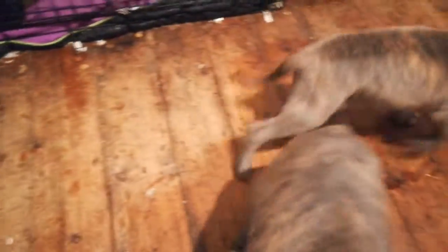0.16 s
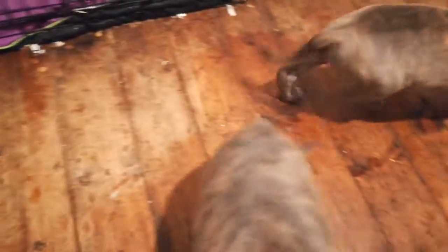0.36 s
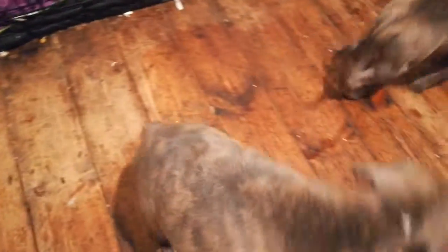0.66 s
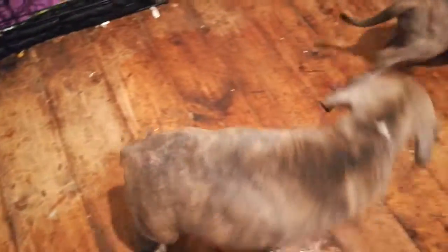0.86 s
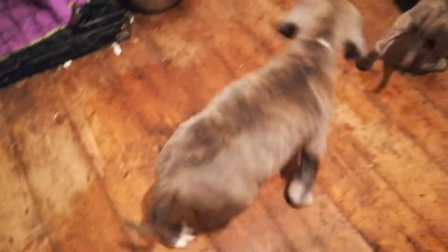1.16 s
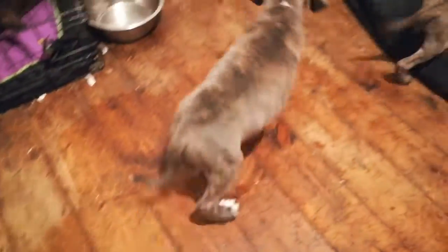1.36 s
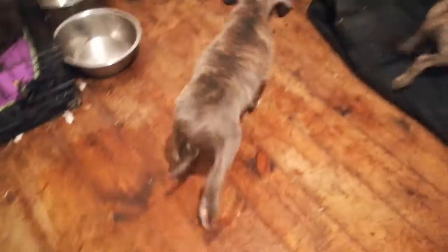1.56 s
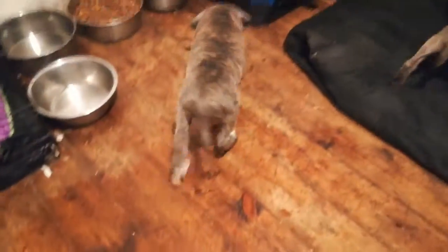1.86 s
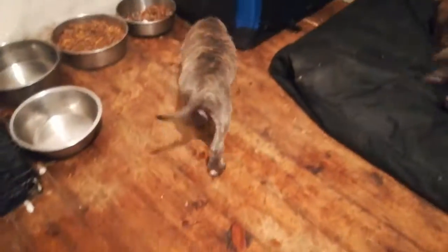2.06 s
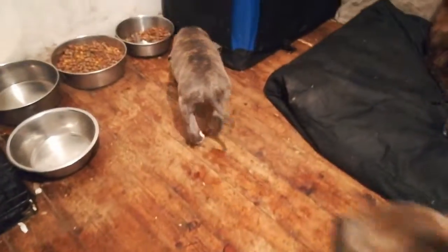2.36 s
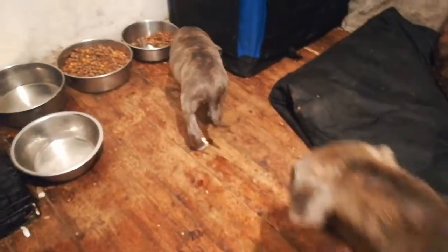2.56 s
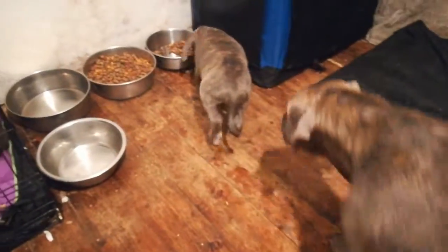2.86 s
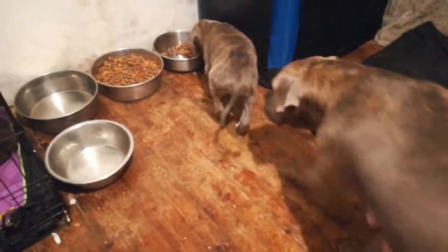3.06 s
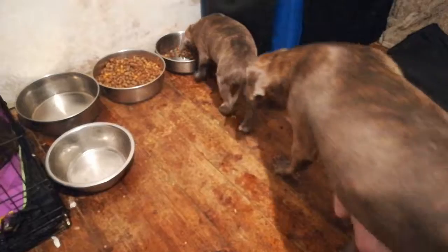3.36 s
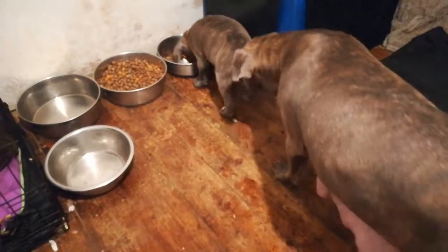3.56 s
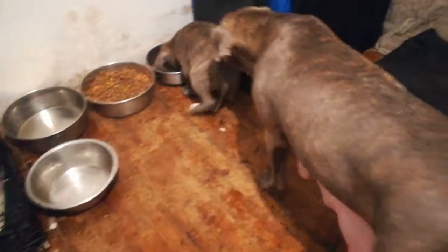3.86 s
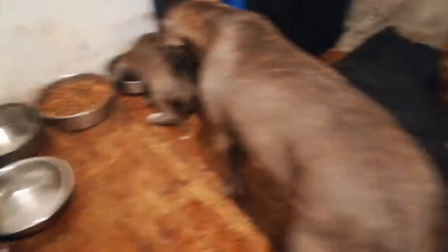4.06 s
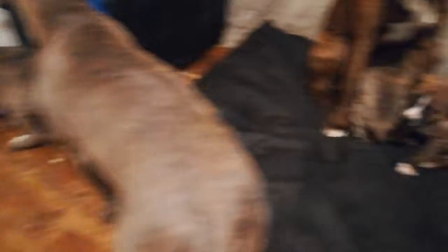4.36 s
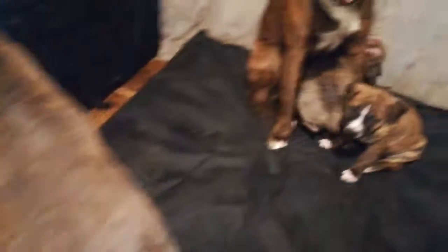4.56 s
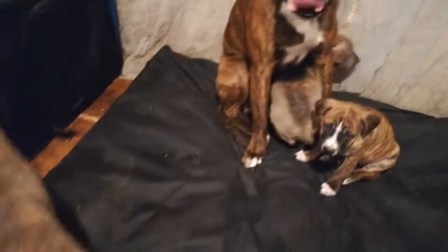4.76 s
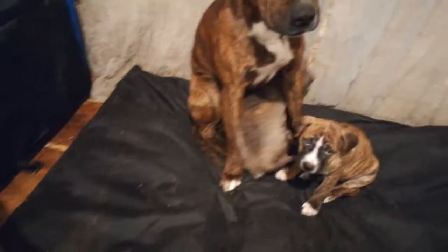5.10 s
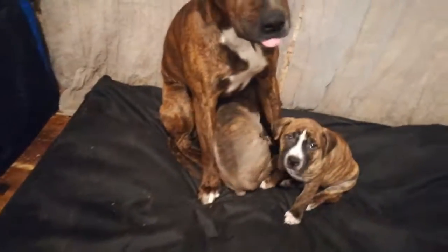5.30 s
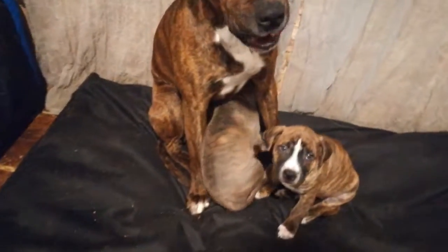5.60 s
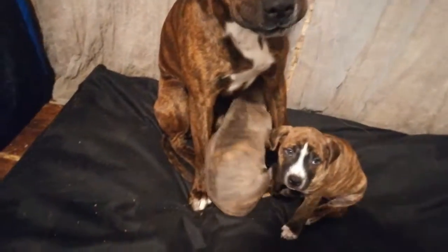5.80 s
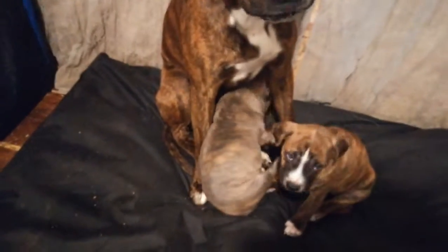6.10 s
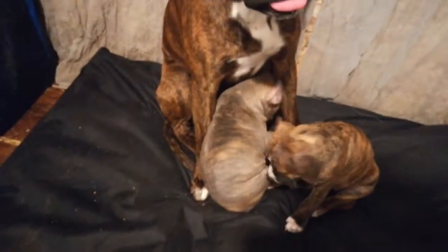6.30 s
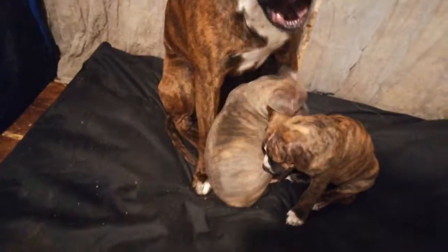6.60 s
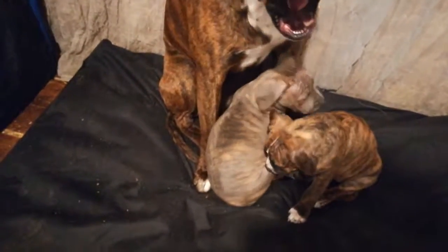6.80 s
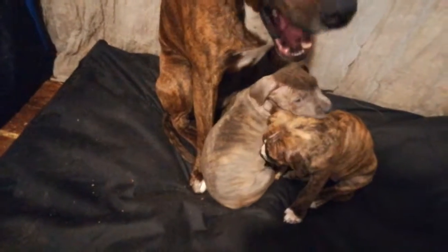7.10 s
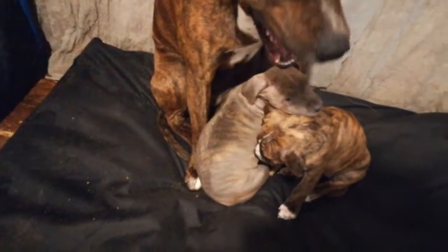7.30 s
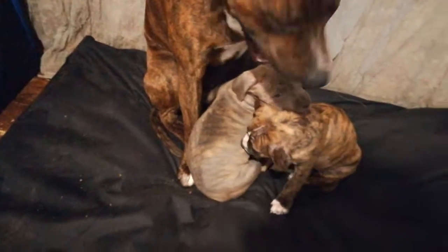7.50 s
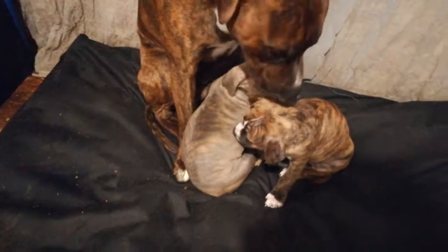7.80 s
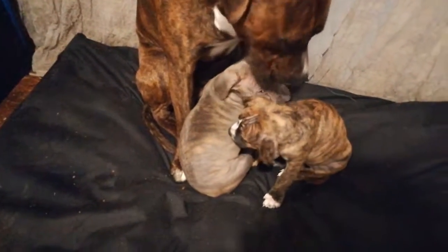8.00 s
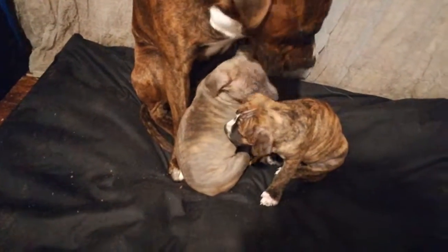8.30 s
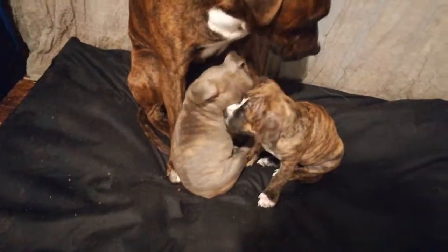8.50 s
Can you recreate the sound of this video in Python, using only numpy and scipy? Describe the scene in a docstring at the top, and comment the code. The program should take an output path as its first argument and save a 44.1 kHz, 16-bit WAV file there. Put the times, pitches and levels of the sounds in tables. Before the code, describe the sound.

Close phone pickup in a small bare-walled room with short bright echo and faint hiss. From 0 s puppy paws scuffle on wooden boards: dull thumps, sharp claw ticks, short scrapes; a small metal tag clinks at once and at 0.2 s. A faint low grunt comes near 0.9 s and thin breathy nose whistles follow. A hard knock lands at 1.6 s, a sharper one with a slide at 2.2 s. A puppy whimpers at 1.75, 2.05, 2.7 and 3.2 s, high tones mostly gliding down, the last strongest near 3.5 s. From 3.5 to 6 s irregular knocks and rubs continue with high whistles around 4.2 s but no cries. At 6.1-6.9 s the scuffle is heaviest, with whistles and short cries. Then paws quiet: a longer falling whine at 7.1 s, a faint low one at 7.8 s, and a last cry from 8.2 s dips and rises to the end.

```python
"""Puppies on a wooden floor in a small bare room, heard by a phone held above them.
From the start paws scuffle (filtered noise and grains) and a metal tag clinks twice (ringing modes);
soon mixed short puffs (band-passed noise) and paw blows (ringing boards, noise cracks) join in.
Low grunts, then thin nasal whistles (breathy gliding sines) follow; from 1.75 s one puppy whimpers
in cries, mostly falling: a strong tone with weak husky overtones. Bare walls echo all but the scuffle."""
import sys
import numpy as np
from scipy import signal
from scipy.fft import rfft, irfft
from scipy.io import wavfile
from scipy.ndimage import uniform_filter1d

SR = 44100
rng = np.random.default_rng(int(sys.argv[2]) if len(sys.argv) > 2 else 0)


def put_to_file(sound):
    """Save the sound as 16-bit audio at rate SR, in the file named by the first command-line argument."""
    columns = np.atleast_2d(sound).T  # one column per channel
    safe = np.clip(columns, -1, 1)
    whole_steps = np.round(safe * 32767)
    wavfile.write(sys.argv[1], SR, whole_steps.astype(np.int16))


N = 381465
T = np.arange(N) / SR


def undb(db):
    """Amplitude ratio of a level in dB."""
    return 10 ** (np.asarray(db) / 20)


def unit(x):
    """Scale to an RMS of 1."""
    return x / np.sqrt(np.mean(x ** 2))


def band(x, hz, width_hz):
    """Band-pass whose edges have the centre as geometric mean."""
    middle = np.hypot(hz, width_hz / 2)
    edges = [middle - width_hz / 2, min(middle + width_hz / 2, SR / 2.1)]
    return signal.sosfilt(signal.butter(2, edges, "band", fs=SR, output="sos"), x)


def walk(rate_hz, size=N):
    """Random levels held 1 / rate_hz and slewed twice; spread near 1."""
    hold = max(int(SR / rate_hz), 1)
    steps = np.repeat(rng.standard_normal(size // hold + 1), hold)
    return 1.456 * uniform_filter1d(uniform_filter1d(steps, hold), hold)[:size]


def pan(x, db):
    """Two channels, the left one db above the right."""
    return x * undb(np.array([db, -db]).reshape(2, -1) / 2)


def add(out, start_s, x):
    """Mix x into out from start_s, cut at the end."""
    i = int(start_s * SR)
    out[:, i:i + x.shape[1]] += x[:, :N - i]


def air():
    """Quiet room tone and microphone hiss: spectrally shaped noise at a drifting level."""
    # noise spectrum: (frequency [Hz], relative density [dB])
    spectrum = [(15, -29), (25, 10), (729, -26), (981, -13.5), (1180, -19), (1360, -14.5), (1640, -29),
                (1780, -23.5), (3780, -30), (5820, -17), (15800, -33)]
    level_db = -56.5
    hz, db = np.transpose(spectrum)
    f = np.maximum(np.arange(N // 2 + 1) * SR / N, 1)
    gain = undb(np.interp(np.log(f), np.log(hz), db))
    noise = irfft(rfft(rng.standard_normal((2, N))) * gain, N)
    return unit(noise) * undb(level_db + 0.82 * walk(4.67))


def grains(rate_hz, spread_db):
    """Dense tiny contacts of very uneven size."""
    hit = rng.random((2, N)) < rate_hz / SR
    return hit * rng.standard_normal((2, N)) * undb(spread_db * rng.exponential(size=(2, N)))


def moves(start_s, held_s, level_db, rise_fall, rest_db):
    """Gain of a layer: every move swells in, holds and dies away (dB/s slopes) over a faint stir."""
    power = np.full(N // 40 + 1, undb(rest_db) ** 2)
    t = np.linspace(0, T[-1], len(power))
    rise, fall = rise_fall
    for s, held, db in zip(start_s, held_s, level_db):
        slope_db = rise * np.maximum(s - t, 0) + fall * np.maximum(t - s - held, 0)
        power += undb(db - slope_db) ** 2
    return np.interp(T, t, np.sqrt(power))


def rumble():
    """Weight shifting on the boards: noise bands, strongest near the boards that give most."""
    # weight coming down: (time [s], held [s], level [dB], pitch of the boards that give most [Hz])
    weight = [(.01, .01, -45.5, 153), (.18, .1, -39.5, 76), (.52, 0.074, -45, 210),
              (.79, 0.039, -43.5, 190), (1.08, 0.043, -44, 230), (1.3, 0.16, -48.5, 151),
              (1.6, 0.033, -42, 130), (1.71, .01, -43.5, 157), (1.95, 0.0073, -47, 70),
              (2.17, .005, -39.5, 178), (2.24, .01, -60, 150), (2.53, .1, -57, 60), (3.11, 0.18, -61.5, 60),
              (3.35, .03, -52, 180), (3.48, 0.13, -44.5, 80), (3.73, 0.0043, -46.5, 99),
              (3.85, 0.1, -44, 80), (4.045, 0.029, -38, 122), (4.15, 0.042, -43, 135),
              (4.3, 0.067, -45.5, 90), (4.48, .05, -50, 220), (4.57, 0.045, -47, 70),
              (4.83, 0.086, -44.5, 101), (5.08, .08, -52, 45), (5.269, 0.058, -44, 121),
              (5.5, 0.055, -44, 70), (5.74, 0.046, -40.5, 70), (5.93, 0.09, -45, 30),
              (6.1, 0.071, -46, 70.4), (6.19, 0.046, -38.5, 75), (6.53, 0.035, -33.5, 100),
              (6.63, 0.045, -35, 79.6), (6.821, 0.049, -34, 81), (7.11, 0.045, -54, 59.5),
              (7.72, 0.04, -46.5, 80), (8.29, 0.018, -49, 280), (8.64, .01, -55, 201)]
    # board bands: (centre [Hz], width [Hz], relative level [dB])
    board_bands = [(25.8, 9.8, 1), (45, 17, -10.5), (74, 18, -1.5), (121.7, 28.4, 0), (192.6, 71, -1.5),
                   (298, 58, -5)]
    off_pitch_db_per_octave, rest_db, rise_fall_db_per_s = 6.5, -69, (370, 217)
    push, out = rng.standard_normal((2, N)), np.zeros((2, N))
    s, held_s, low_db, board_hz = np.transpose(weight)
    for hz, width_hz, db in board_bands:
        band_db = low_db - off_pitch_db_per_octave * abs(np.log2(hz / board_hz))
        gain = moves(s, held_s, band_db, rise_fall_db_per_s, rest_db)
        out += undb(db) * unit(band(push, hz, width_hz)) * gain
    return out


def scuffle():
    """Weight rumbles on the boards, dragged pads rub and claws rasp: bands of noise and of grains."""
    # drags: (time [s], held [s], pad rub level [dB], claw rasp level [dB], rasp brightness [dB/octave])
    drags = [(.005, 0.11, -56.5, -53.5, 3), (.18, 0.039, -52, -49.5, -1), (.3, 0.096, -56, -56, 1.5),
             (0.548, 0.11, -60.5, -56.5, 5.5), (.72, 0.047, -57, -65.5, -9.5), (.805, 0.052, -55, -56.5, 1),
             (1.06, 0.051, -61.5, -83, 12), (1.302, .03, -52, -64, 2), (1.39, 0.14, -59, -62.5, .1),
             (1.588, 0.018, -44.5, -64, 2), (1.721, 0.052, -54.5, -63, -2), (1.88, 0.012, -74, -75, 1),
             (2.178, 0.0034, -39.5, -50.5, -2), (2.88, 0.22, -73.5, -86, -14), (3.3, .005, -72, -57, 4),
             (3.35, 0.0059, -55.5, -76, .1), (3.558, 0.0034, -46.5, -49, .1),
             (3.68, 0.0061, -54.5, -77, .1), (3.78, 0.019, -62.5, -63, -4), (3.93, 0.043, -67, -61.5, -1.5),
             (4.05, 0.033, -51, -54.5, 1), (4.2, 0.02, -66.5, -63.5, -10.5),
             (4.31, 0.033, -64.5, -59, -0.5), (4.38, 0.081, -51.5, -53, 0),
             (4.568, 0.005, -52, -51.5, -3.5), (4.94, 0.026, -67, -60, -1), (5.059, 0.074, -54.5, -55, 2),
             (5.3, 0.041, -74, -62.5, 1.5), (5.45, 0.021, -70.5, -67, 1), (5.727, 0.03, -50.5, -55.5, -6),
             (6.11, .06, -56, -53.5, -1.5), (6.19, .025, -51.5, -43, 6.5), (6.537, 0.042, -46.5, -52, -3),
             (6.62, .03, -53, -52, -2.5), (6.71, 0.045, -58, -46.5, 4), (6.82, 0.09, -55.5, -66, 1),
             (7.33, 0.06, -99.5, -87, 2), (8.25, 0.17, -74.5, -68, -2), (8.63, .02, -68, -75, .1)]
    # pad rub bands: (centre [Hz], width [Hz], relative level [dB])
    rub_bands = [(530, 1300, 8), (1244, 1320, -0.5), (2030, 2840, -2.5)]
    # claw rasp bands: (centre [Hz], width [Hz], relative level [dB])
    rasp_bands = [(4220, 4800, 2.5), (6000, 8000, 2.5), (7580, 2050, 0.5), (10550, 3200, -11.5),
                  (14100, 17000, -3)]
    rub_rest_db, rub_rise_fall_db_per_s = -77, (330, 176)
    rasp_rest_db, rasp_rise_fall_db_per_s = -74.5, (440, 145)
    drag, scratch = grains(3000, 1.6), grains(6000, 1.3)
    s, held_s, rub_db, rasp_db, bright_db = np.transpose(drags)
    rub, rasp = np.zeros((2, N)), np.zeros((2, N))
    for hz, width_hz, db in rub_bands:
        rub += undb(db + 1.62 * walk(14)) * unit(band(drag, hz, width_hz))
    rub *= moves(s, held_s, rub_db, rub_rise_fall_db_per_s, rub_rest_db)
    for hz, width_hz, db in rasp_bands:
        band_db = rasp_db + bright_db * np.log2(hz / rasp_bands[2][0])
        gain = moves(s, held_s, band_db, rasp_rise_fall_db_per_s, rasp_rest_db)
        rasp += undb(db + 3.5 * walk(18)) * unit(band(scratch, hz, width_hz)) * gain
    return rumble() + rub + rasp


def ring(modes, jitter, size):
    """Decaying sines of a struck object, every mode a little different each time."""
    t, (hz, db, t60_s) = T[:size, None], np.transpose(modes)
    hz = hz * (1 + jitter * rng.standard_normal(len(hz)))
    db = db + 3 * rng.standard_normal(len(hz))
    return (undb(db - 60 * t / t60_s) * np.sin(2 * np.pi * hz * t)).sum(axis=1)


def tag_clinks():
    """A small metal tag rings in high, short modes."""
    # modes of the tag: (frequency [Hz], level [dB], t60 [s])
    tag = [(5100, -10, .06), (7450, -10, .08), (11930, -4, .07), (12020, 0, .07), (15050, -2, .05)]
    # clinks: (time [s], level [dB])
    clinks = [(.005, -40), (0.171, -35.5)]
    out = np.zeros((2, N))
    for s, db in clinks:
        add(out, s, pan(undb(db) * ring(tag, jitter=0.0038, size=9000), -0.87))
    return out


def puffs():
    """Short puffs of band-passed noise: breathy blips, faint murmurs, soft scrapes, in a rounded swell."""
    # puffs: (time [s], length [s], centre [Hz], width [Hz], level [dB])
    blips = [(.165, 0.028, 4870, 1200, -42), (0.79, 0.045, 5260, 696, -46.5),
             (4.925, 0.045, 5730, 600, -57), (6.8, 0.073, 346, 350, -50.5), (0.366, 0.053, 1360, 704, -48),
             (3.453, 0.14, 5800, 6950, -51), (4.623, 0.059, 1450, 350, -50.5),
             (5.139, 0.11, 1530, 350, -52.5), (5.204, 0.086, 1470, 350, -54.5),
             (1.047, 0.057, 497, 704, -50), (3.966, 0.035, 806, 400, -54), (4.407, 0.045, 890, 800, -43),
             (4.798, 0.073, 4960, 900, -53.5), (4.847, 0.081, 2780, 600, -58), (4, 0.11, 2840, 756, -73),
             (5.256, 0.11, 8900, 1200, -57), (5.944, 0.03, 1660, 1490, -55.5)]
    out = np.zeros((2, N))
    for s, length_s, hz, width_hz, db in blips:
        puff = unit(band(rng.standard_normal(4000), hz, width_hz))[:int(length_s * SR)]
        add(out, s, pan(undb(db) * puff * np.hanning(len(puff)), 0))
    return out


def blows():
    """Each paw knocks the boards, cracks a claw with a colour of its own and slides a little."""
    # paw blows: (time [s], board knock level [dB], claw crack level [dB], slide hiss level [dB],
    # thump pitch [Hz], crack colour [Hz])
    paws = [(0.167, -35, -32, -62, 150, 1900), (0.348, -44, -40.5, -52, 140, 1220),
            (0.539, -47, -44, -39.5, 280, 1290), (0.801, -43, -31, -64, 182, 1980),
            (1.058, -38, -50, -66, 243, 960), (1.287, -38.5, -34.5, -54, 258, 2060),
            (1.38, -37, -37.5, -48, 178, 930), (1.519, -38, -32.5, -44, 230, 860),
            (1.571, -27.5, -31, -42, 113, 930), (1.867, -50, -39, -61, 99.6, 1590),
            (2.119, -36, -35, -64, 183, 1630), (2.165, -29.5, -21.5, -26.5, 191, 1360),
            (2.519, -61, -45, -74, 96.9, 1470), (3.33, -42, -51, -57, 213, 1530),
            (3.543, -37, -36, -42, 73.4, 1500), (3.671, -34, -39, -65, 138, 860),
            (3.918, -42.5, -51, -56, 150, 1830), (4.035, -30, -30, -47, 130, 895),
            (4.2, -49, -37, -78, 209, 1800), (4.348, -38.5, -40.5, -57, 170, 920),
            (4.565, -48, -37.5, -56, 312, 2000), (4.927, -40, -51, -48, 64.6, 940),
            (5.049, -63, -39, -70, 306, 2530), (5.248, -41.5, -43.5, -51, 124, 1490),
            (5.64, -46, -58, -48, 238, 859), (5.714, -43, -32, -70, 75.4, 1290),
            (6.093, -37.5, -39.5, -50, 230, 1770), (6.183, -29, -34.5, -35, 247, 1730),
            (6.512, -27, -34, -64, 127, 1340), (6.615, -34, -31, -61, 77, 895),
            (6.699, -53, -42, -46, 70.0, 2160), (6.814, -33, -40, -68, 78.1, 1400),
            (7.7, -46.5, -51, -64, 83.4, 2090), (8.62, -65, -37, -50, 356, 1340)]
    # modes of the boards: (frequency [Hz], level [dB], t60 [s])
    boards = [(73, -23, 0.11), (117.6, -18.5, 0.33), (189.6, -6.5, 0.21), (242, -5, 0.16),
              (330, -6.5, 0.08), (463, -18, .053), (631, -11, 0.099), (864, 9.5, 0.098)]
    burst_db, snap_t60_s = 7.5, 0.023
    slide_db, slide_t60_s = -9, .19  # slide relative to the snap
    contact_s, hard_db = .0012, -28  # contact time of a blow this loud; softer ones take longer
    out, t = np.zeros((2, N)), T[:9000]
    snap, slide = undb(-60 * t / snap_t60_s), undb(slide_db - 60 * t / slide_t60_s)
    burst = undb(burst_db) * (snap + slide)
    for s, knock_db, crack_db, hiss_db, thump_hz, crack_hz in paws:
        touch = np.minimum(t / (contact_s * undb(hard_db - max(crack_db, hiss_db))), 1)
        noise = rng.standard_normal(len(t)) * burst * touch
        # the blow drives the board modes nearest its own pitch hardest
        struck = ring(boards, jitter=0.059, size=len(t)) * np.sqrt(touch)
        knock = band(struck, thump_hz, 1.13 * thump_hz)
        crack = band(noise, crack_hz, 0.42 * crack_hz) + undb(-2.0) * band(noise, 1580, 1970)
        hiss = band(noise, 4170, 6600)
        blow = undb(knock_db) * knock + undb(crack_db) * crack + undb(hiss_db) * hiss
        add(out, s, pan(blow, 0))
    return out


def sing(table, waver, shimmer_db):
    """Start of a call, its wavering phase, a soft-edged trembling swell and its other columns."""
    s, hz, *rest = np.transpose(table)
    t = T[int(s[0] * SR):int(s[-1] * SR)]
    size = len(t)
    pitch_hz = np.interp(t, s, hz) * (1 + waver * (walk(121.0, size=size) + walk(29.95, size=size)))
    phase = 2 * np.pi * np.cumsum(pitch_hz) / SR
    edge = np.clip(np.minimum(t - t[0], t[-1] - t) / .004, 0, 1)
    swell = np.sqrt(2) * edge * undb(shimmer_db * walk(42.34, size=size))
    return s[0], phase, swell, [np.interp(t, s, column) for column in rest]


def husk(phase, rough):
    """A partial with breath noise wrapped round it."""
    size = len(phase)
    noise = walk(247.2, size=size) * np.sin(phase) + walk(245.6, size=size) * np.cos(phase)
    return np.sin(phase) + rough * noise


def arch(row, rise_db, fade_db):
    """A short call glides straight between two pitches, swells to its peak and fades."""
    s, length_s, first_hz, last_hz, db = row
    share = 0.81 if last_hz > 1.1 * first_hz else 0.34  # upward leaps peak near their top
    peak_hz = first_hz + share * (last_hz - first_hz)
    return [(s, first_hz, db - rise_db), (s + share * length_s, peak_hz, db),
            (s + length_s, last_hz, db - fade_db)]


def grunts():
    """Low grunts: one breathy partial each, gliding down."""
    # grunts: (time [s], length [s], first pitch [Hz], last pitch [Hz], peak level [dB])
    calls = [(0.921, .2, 376, 329.4, -56.5), (2.62, .2, 265, 257, -60.5)]
    out = np.zeros((2, N))
    for call in calls:
        s, phase, swell, (db,) = sing(arch(call, rise_db=5.5, fade_db=5), waver=0.025, shimmer_db=4.5)
        add(out, s, pan(swell * undb(db) * husk(phase, .4), 0))
    return out


def whistles():
    """Nasal whistles: a breathy gliding tone with a faint octave, leaning left."""
    # whistles: (time [s], length [s], first pitch [Hz], last pitch [Hz], peak level [dB])
    calls = [(1.021, 0.067, 6970, 6940, -65.5), (1.464, 0.12, 8360, 8720, -55.5),
             (1.703, 0.068, 8780, 8440, -62), (1.827, .06, 7070, 7100, -59), (2, 0.14, 7960, 8040, -42.5),
             (2.22, 0.048, 9180, 9120, -55), (2.406, .09, 6810, 7110, -56), (2.965, 0.074, 6760, 6760, -51),
             (3.543, .12, 7015, 7050, -39.5), (3.75, 0.11, 7120, 7000, -43),
             (4.149, 0.049, 7770, 6950, -37.5), (4.161, 0.077, 7040, 7000, -44),
             (4.356, 0.031, 7400, 9340, -42), (4.378, 0.072, 9300, 9170, -43.5),
             (4.397, .12, 7250, 6850, -37.5), (4.943, 0.058, 5220, 5220, -55),
             (5.798, 0.07, 6800, 6720, -55.5), (6.124, .07, 7220, 9480, -46),
             (6.176, 0.081, 6380, 6500, -39), (6.344, 0.075, 7130, 7126, -34),
             (6.402, 0.09, 7350, 6770, -48.5), (7.019, 0.07, 8200, 8300, -63.5),
             (7.471, 0.093, 7000, 7100, -67.5), (7.97, 0.068, 7320, 7220, -71),
             (8.153, 0.11, 8000, 8050, -60)]
    pan_db, octave_db = 13, -21
    out = np.zeros((2, N))
    for call in calls:
        s, phase, swell, (db,) = sing(arch(call, rise_db=6.5, fade_db=29), waver=.008, shimmer_db=3.5)
        no_alias = np.gradient(phase) < np.pi / 3.05
        octave = undb(octave_db) * np.sin(2 * phase) * no_alias
        add(out, s, pan(swell * undb(db) * (husk(phase, .5) + octave), pan_db))
    return out


def cries():
    """Cries: a strong tone, weak husky overtones coloured by throat and mouth, and nasal air."""
    # one table a cry: (time [s], pitch [Hz], level [dB], overtone lift by the open mouth [dB])
    calls = [
        [(1.75, 1624, -60, 8), (1.768, 1540, -40, 11), (1.8, 1489, -42.5, 1.5), (1.86, 1538, -54, 14),
         (1.9, 1455, -56, -4)],
        [(2.04, 1770, -90, 5), (2.066, 1648, -48.5, 1), (2.15, 1627, -65, 0), (2.174, 1581, -35, 6.5),
         (2.252, 1517, -41, -16), (2.292, 1366, -34, -2.5), (2.412, 1350, -38, -3), (2.5, 1327, -64, -5)],
        [(2.7, 1527, -67, 0), (2.712, 1550, -40, -10), (2.732, 1514, -33, -3), (2.79, 1436, -41, -0.5),
         (2.832, 1385, -37.5, -7), (2.93, 1369, -35.5, 1.5), (3.014, 1367, -57, -3), (3.05, 1260, -61, 0)],
        [(3.2, 1663, -96, 5), (3.212, 1682, -42, 1.5), (3.26, 1638, -40, 12.5), (3.31, 1517, -37, 8.5),
         (3.356, 1464, -32.5, 6), (3.39, 1458, -49.5, 23.5), (3.46, 1428, -26.5, 7.5), (3.486, 1403, -26, 4.5),
         (3.59, 1405, -66, 12), (3.65, 1370, -46, -2)],
        [(6.25, 1735, -53, 5), (6.276, 1713, -35.5, 5.5), (6.314, 1739, -42, 6), (6.36, 1710, -51, -4),
         (6.43, 1684, -63.5, -5)],
        [(6.71, 1776, -80, 9), (6.734, 1750, -43, 0), (6.775, 1677, -41, 3), (6.8, 1579, -41, 6.5),
         (6.826, 1539, -38, 6), (6.846, 1400, -36.5, -5), (6.864, 1289, -47.5, -16), (6.92, 1343, -64, -2)],
        [(7.12, 1560, -92, 0), (7.148, 1408, -32, -16), (7.272, 1246, -36, -0.5), (7.3, 1090, -38, -11),
         (7.35, 1050, -50, 3), (7.4, 1069, -55.5, 9.5), (7.42, 1075, -40, 0), (7.49, 1071, -45, 0),
         (7.524, 1077, -53.5, -24), (7.56, 1060, -83, 0)],
        [(7.825, 1100, -70, 4), (7.842, 1070, -53, 0), (7.892, 1036, -47.5, 6), (7.97, 1002, -46, 4),
         (8.0, 995, -56, 1), (8.04, 1003, -80, -7)],
        [(8.21, 1646, -57.5, -3), (8.242, 1674, -49.5, 6), (8.295, 1563, -45, 6.5), (8.336, 1423, -34.5, -3),
         (8.41, 1139, -32.5, -5.5), (8.458, 1072, -45.5, 5), (8.564, 1133, -36.5, -5), (8.598, 1200, -30, -4.5),
         (8.65, 1316, -33.5, -13)],
    ]
    # one row a cry: (first mouth resonance [Hz], last mouth resonance [Hz], overtone slope [dB/octave])
    mouths = [(4800, 4500, -3.5), (4800, 2800, -8), (3400, 2500, -1.5), (5130, 8500, -4.5), (5200, 4200, 1),
              (5000, 4600, -3.5), (3900, 3200, -3.5), (3780, 5000, -6.5), (5050, 3200, -6)]
    # throat, overtones under the tone: (frequency [Hz], level [dB])
    throat = [(2000, -30.5), (2500, -27), (2900, -28), (3400, -23.5), (4300, -37), (5500, -37.5),
              (7200, -35), (9000, -37), (12000, -53.5), (15000, -86)]
    mouth_db, mouth_octaves, odd_db = 9, 0.43, 4  # resonance lift and width; odd overtones stand out
    nose_hz, nose_width_hz, nose_db = 7760, 2500, -27.5
    hoarse, hoarse_s = .5, .06  # a cry starts hoarse and clears
    closed_db, open_s = -4, .03  # the mouth is still half shut as a cry starts
    out, (throat_hz, throat_db) = np.zeros((2, N)), np.transpose(throat)
    for call, (first_hz, last_hz, slope_db) in zip(calls, mouths):
        s, phase, swell, (db, lift_db) = sing(call, waver=.007, shimmer_db=2.5)
        step = np.gradient(phase)  # rad per sample
        hz = uniform_filter1d(step, size=400) * SR / (2 * np.pi)
        t = T[:len(hz)]
        faint = np.clip((-43 - db.max()) / 20, 0, 1.5)  # faint cries are breathier
        breath = faint + .12 + hoarse * np.exp(-t / hoarse_s)
        lift_db = lift_db + closed_db * np.exp(-t / open_s)
        mouth_hz = np.geomspace(first_hz, last_hz, len(hz))
        tone = husk(phase, breath)
        for k in range(2, 11):
            colour_db = np.interp(np.log(k * hz), np.log(throat_hz), throat_db)
            colour_db += lift_db + 3 * walk(18.2, size=len(hz))
            colour_db += mouth_db * np.exp(-(np.log2(k * hz / mouth_hz) / mouth_octaves) ** 2)
            colour_db += slope_db * np.log2(k / 3) + odd_db * (k % 2)
            no_alias = k * step < 2
            tone += undb(colour_db) * husk(k * phase, breath + .2 * (k - 1)) * no_alias
        hiss = unit(band(rng.standard_normal(len(tone)), nose_hz, nose_width_hz))
        tone += undb(nose_db + lift_db + slope_db) * hiss
        add(out, s, pan(swell * undb(db) * tone, 0))
    return out


def room(x):
    """Dense echoes of bare walls, unlike at each port; after 0.1 s the phone's noise suppression
    pulls the tail down faster."""
    t60_s, echo_db = .33, 2.5
    knee_s, late_t60_s = .1, .11  # the late decay adds to the first
    t = T[:20000]
    noise = rng.standard_normal((2, len(t))) * (t > .004)
    tail = noise * undb(-60 * t / t60_s - 60 * np.maximum(t - knee_s, 0) / late_t60_s)
    tail *= undb(echo_db) / np.sqrt(np.sum(tail ** 2, axis=1, keepdims=True))
    return x + signal.fftconvolve(x.mean(axis=0, keepdims=True), tail)[:, :N]


def scene():
    """Tag, puffs, paws and voices echo in the room; scuffle and air are added without echo."""
    background = air() + scuffle()
    return background + room(tag_clinks() + puffs() + blows() + grunts() + whistles() + cries())


def record(dry):
    """The two microphone ports differ in level by frequency, nearly share the bass; the top is cut."""
    # lean of the ports: (frequency [Hz], left minus right [dB])
    port_lean = [(60, 1.5), (110, -1), (200, 1.5), (380, -2.5), (700, -1.5), (1290, -1.0), (2380, -2.5),
                 (4400, 1), (8120, 7.5), (15000, -12.5)]
    shared_below_hz, bass_side_db, top_hz = 426, -20.5, 15600
    hz, db = np.transpose(port_lean)
    lean_db = np.interp(np.arange(N // 2 + 1) * SR / N, hz, db)
    left, right = irfft(pan(rfft(dry), lean_db), N)
    mid, side = (left + right) / 2, (left - right) / 2
    high = signal.butter(2, shared_below_hz, "high", fs=SR, output="sos")
    side = signal.sosfilt(high, side) + undb(bass_side_db) * side
    low = signal.ellip(10, .2, 80, top_hz, fs=SR, output="sos")
    return signal.sosfilt(low, np.array([mid + side, mid - side]))


dry = scene()
out = record(dry)
put_to_file(out)
```